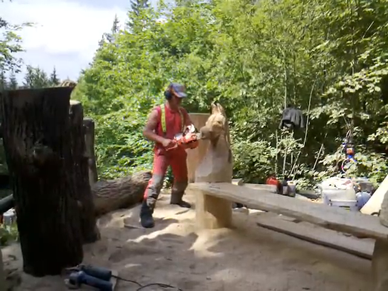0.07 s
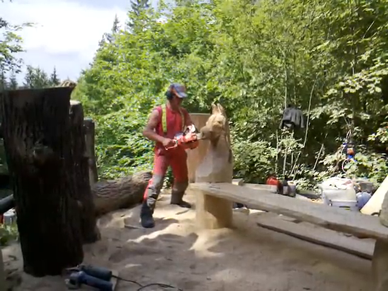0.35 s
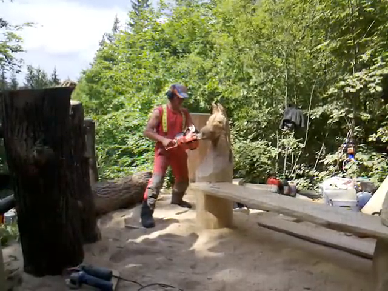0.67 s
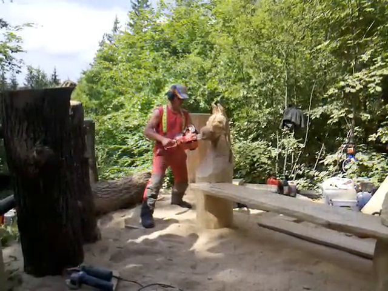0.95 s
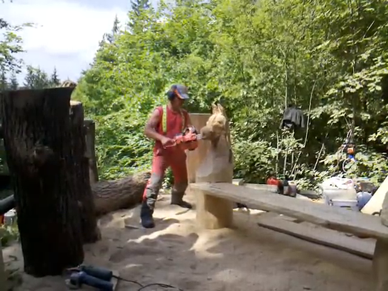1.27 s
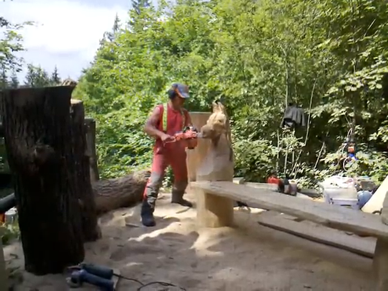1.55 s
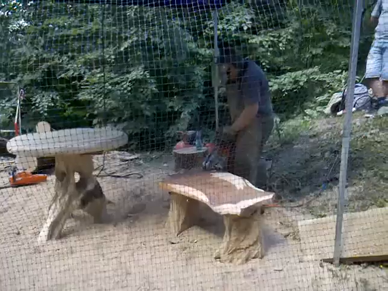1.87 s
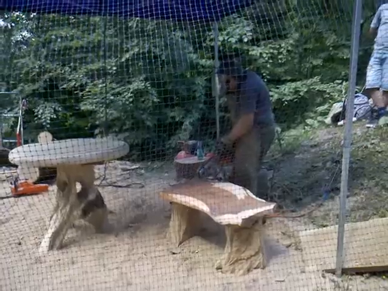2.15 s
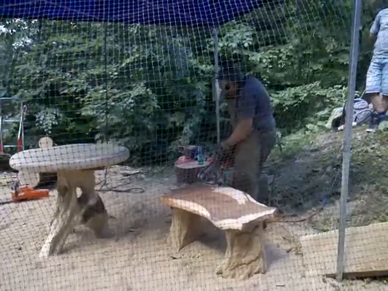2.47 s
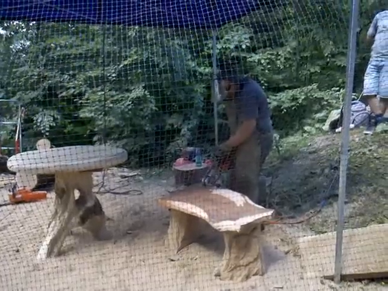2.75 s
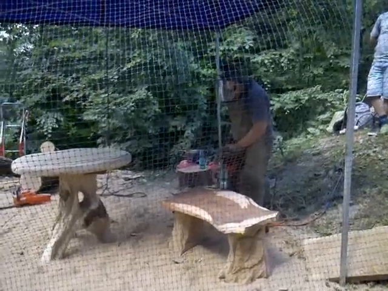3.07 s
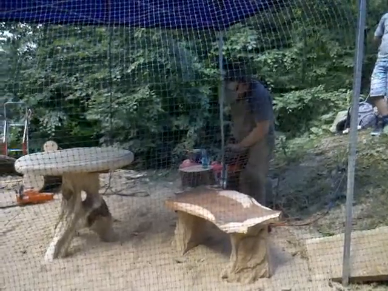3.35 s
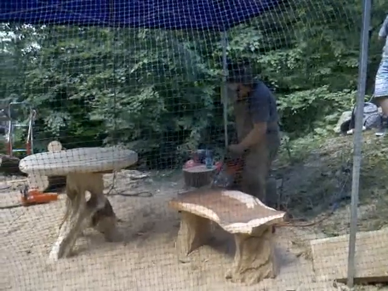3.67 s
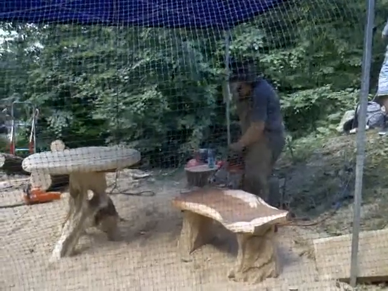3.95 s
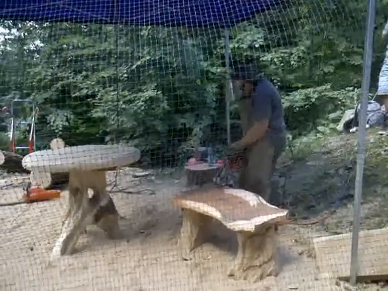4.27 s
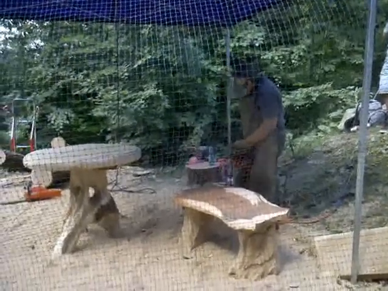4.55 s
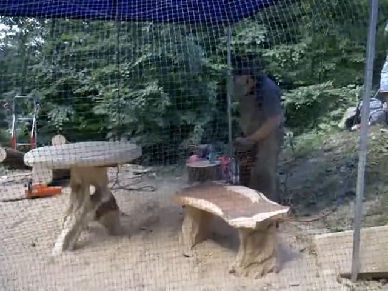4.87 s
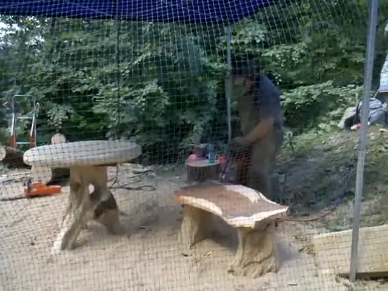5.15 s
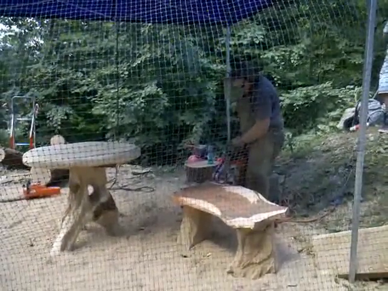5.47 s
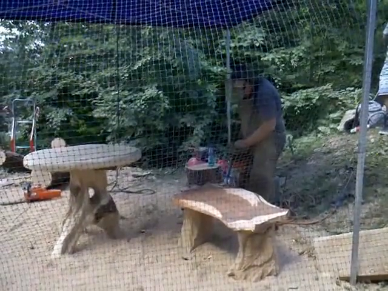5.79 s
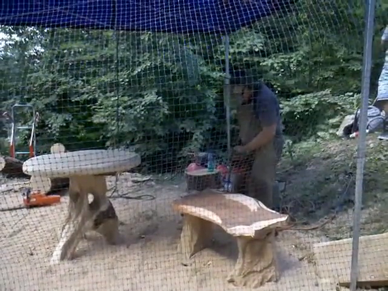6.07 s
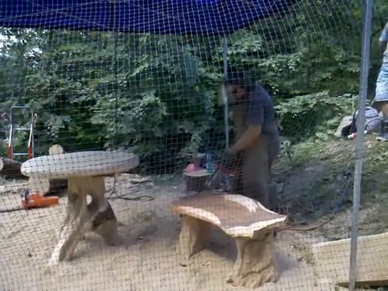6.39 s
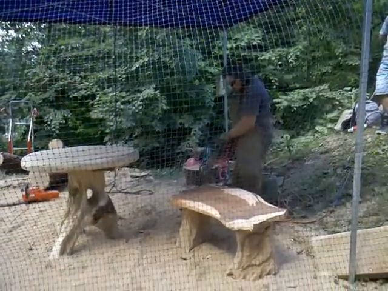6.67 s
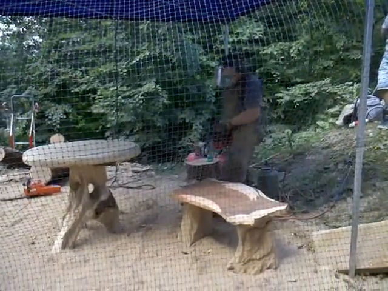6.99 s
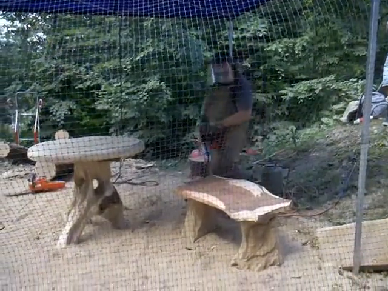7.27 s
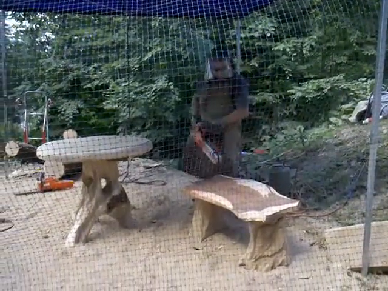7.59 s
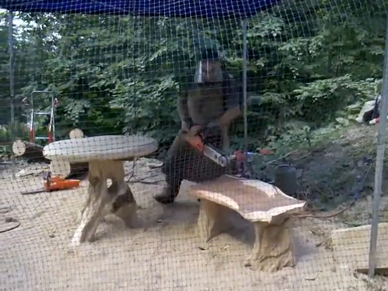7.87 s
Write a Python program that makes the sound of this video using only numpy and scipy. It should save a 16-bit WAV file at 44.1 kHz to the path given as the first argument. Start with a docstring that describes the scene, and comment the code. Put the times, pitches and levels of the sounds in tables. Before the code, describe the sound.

A two-stroke chainsaw is already running outdoors, revving in five short, light strokes on wood, with chain rattle and a high cutter hiss. A neighbouring saw revs faintly at the start, and a thin distant tool whine sounds then and again around 1.3 seconds. At about 1.75 seconds everything cuts to silence.

At 2.4 seconds a second chainsaw fades in at full throttle, chattering briefly as it bites into a stump. It holds one long, rasping, hissing cut, its pitch sagging and recovering under load. Shrill little chain squeaks come and go between 2.9 and 5.4 seconds, and faint dull thuds fall near 3.3, 4.7 and 6.2. At 6.7 the throttle lets go and the chain rattles freely. A quick blip follows at 7 seconds, then a louder rising rev from 7.6 to the end near 8. The sound is stereo with very short, light echoes.

```python
"""A two-stroke chainsaw revs in short strokes outdoors, other tools faint behind it; then silence.
A second wood carver's saw holds a long cut, lets go, blips the throttle and revs up again.
Engine speed drives both saws: firings ring the muffler, chain links rattle on the bar,
and the cutters hiss, chatter and squeak in the wood."""
import sys
import numpy as np
from scipy import signal
from scipy.fft import rfft, irfft, next_fast_len
from scipy.io import wavfile
from scipy.ndimage import uniform_filter1d

SR = 44100
rng = np.random.default_rng(int(sys.argv[2]) if len(sys.argv) > 2 else 0)


def persist_wave(psi):
    """Save psi, clipped to +-1, as 16-bit WAV."""
    counts = np.round(np.clip(psi, -1, 1) * 32767).astype(np.int16)
    wavfile.write(sys.argv[1], SR, np.atleast_2d(counts).T)


N = 349713
T = np.arange(N) / SR
STOP_S = 1.755  # first saw
START_S, FULL_S, RELEASE_S, LIFT_S, TURN_S = 2.4285, 2.73, 6.71, 7.28, 7.55  # second saw
WORKING_HZ, LINKS_PER_TURN, LINKS_IN_LOOP = 165, 7, 56
# muffler response, second and far saw: freq_hz, gain_db
MUFFLER = [(100, -61.5), (250, -57), (340, -16), (420, -28), (500, -7.5), (570, -2), (640, 8), (710, -1),
           (800, -20.5), (1000, -31), (1350, -20.5), (2000, -32), (3500, -50), (7000, -52)]


def undb(db):
    """Decibels to gain."""
    return 10 ** (np.asarray(db) / 20)


def curve(points):
    """Control signal through (time_s, value) points."""
    return np.interp(T, *np.transpose(points))


def over_hz(points):
    """Each table column interpolated over log frequency at every FFT bin."""
    hz, *columns = np.transpose(points)
    bins = np.fft.rfftfreq(next_fast_len(N + SR // 4, True) // 2 * 2, 1 / SR)
    return [np.interp(np.log(bins + 1), np.log(hz), c) for c in columns]


def colour(x, response):
    """Minimum-phase filter: clicks ring after they strike."""
    cepstrum = irfft(np.log(undb(over_hz(response)[0])))
    size = len(cepstrum)
    spectrum = np.exp(rfft(2 * cepstrum[:size // 2], size) - cepstrum[0])
    return irfft(rfft(x, size) * spectrum)[:N]


def level(x, db):
    """Set short-term rms to a level or level curve."""
    power = uniform_filter1d(uniform_filter1d(x * x, size=3000), size=3000)
    return x * undb(db) / np.sqrt(np.abs(power) + 1e-18)


def walk(rate_hz):
    """Smooth random wander, spread near 1."""
    step = max(int(SR / rate_hz), 2)
    return 1.27 * uniform_filter1d(rng.standard_normal(N)[np.arange(N) // step], step)


def ramp(start_s, length_s):
    """Linear rise from 0 to 1."""
    return np.clip((T - start_s) / length_s, 0, 1)


def held(events, attack_s, release_s):
    """Attack-hold-release gain of rows (start_s, end_s, ..., level_db)."""
    return sum(undb(db) * ramp(start, attack_s) * (1 - ramp(end, release_s))
               for start, end, *_, db in events)


def glides(strokes, ease):
    """Points (time_s, hz) through each stroke: lag > 1 delays the start, ease > 1 flattens the end."""
    progress = np.linspace(0, 1, 20)
    return [(start + (end - start) * u, first + (last - first) * (1 - (1 - u ** lag) ** ease))
            for start, end, first, last, lag, _ in strokes for u in progress]


def by_speed(speed_hz, db, db_per_octave):
    """Level rising with engine speed; db at WORKING_HZ."""
    return db + db_per_octave * np.log2(speed_hz / WORKING_HZ)


def crank(speed_hz, wobble):
    """Running count of turns of a slightly uneven shaft."""
    return np.cumsum(speed_hz * (1 + wobble * walk(60))) / SR


def pulses(cycles, scatter_db, jitter, pattern=(1,)):
    """One click a cycle, uneven in timing and size."""
    count = np.arange(1, int(cycles[-1]))
    timing, strength = rng.standard_normal((N // 30, 2))[count].T
    at = np.interp(count + jitter * timing, cycles, np.arange(N))
    size = undb(scatter_db * strength) * np.resize(pattern, len(count))
    i, fraction = at.astype(int), at % 1
    return (np.bincount(i, size * (1 - fraction), N + 1) + np.bincount(i + 1, size * fraction, N + 1))[:N]


def firing(turns, scatter_db, jitter, gas):
    """A pressure pulse and a puff of gas every turn."""
    puff = np.exp(-(turns % 1) / .29) * rng.standard_normal(N)
    return pulses(turns, scatter_db, jitter) + gas * puff


def rattle(turns, scatter_db, jitter, clatter_db, rush_db):
    """Unequal links knock loop after loop; the crank gear clatters alike each turn; air rushes."""
    links = pulses(LINKS_PER_TURN * turns, scatter_db, jitter, rng.standard_normal(LINKS_IN_LOOP))
    one_turn = rng.standard_normal(256)
    clatter = np.interp(turns, np.arange(256) / 256, one_turn, period=1) * undb(2 * walk(200))
    return level(links, 0) + level(clatter, clatter_db) + undb(rush_db) * rng.standard_normal(N)


def cutting(turns, throb, flicker_db):
    """Cutters tear fibres: noise that throbs with the engine and flickers with the bite."""
    bite = (1 + throb * np.cos(2 * np.pi * turns)) * undb(flicker_db * (walk(45) + walk(500)))
    return bite * rng.standard_normal(N)


def tones(turns, orders, waver_db):
    """Intake hum or fan whine: steeply louder with speed, wavering as the saw moves."""
    push = (np.gradient(turns) * SR / WORKING_HZ) ** 3
    return push * sum(2 ** .5 * undb(db + waver_db * walk(14)) * np.sin(2 * np.pi * round(order) * turns)
                      for order, db in orders)


def first_saw():
    """Short light strokes with the tip of the bar."""
    # throttle squeezes: open_s, close_s, open_hz, close_hz, lag, exhaust_db
    strokes = [(0, .43, 186.1, 161.7, 1.78, -28), (.52, .73, 161.9, 183, 1.28, -24.5),
               (.93, 1.13, 140.5, 160, 1.15, -24.5), (1.16, 1.47, 160.6, 179.9, 1.3, -24),
               (1.56, 1.9, 156.9, 179.5, 1.1, -24)]
    # muffler, bar and cutter responses: freq_hz, gain_db
    muffler = [(170, -36), (340, -18.5), (480, 1), (700, 0.5), (850, -10.5), (1050, -0.5), (1350, -13),
               (1550, -1), (1950, -16.5), (6000, -55.5)]
    bar = [(60, -25), (250, -8.5), (500, 3), (1000, 2), (2200, -3), (3400, -7.5), (4300, 0), (5400, -6.5),
           (11000, -12.5)]
    cutters = [(4000, -34), (8000, -20.5), (9500, -7), (10900, -6.5), (11900, 0.5), (12600, 0.5),
               (13700, -5)]
    # intake hum at WORKING_HZ: crank_order, level_db
    intake = [(1, -43.5), (2, -45)]
    speed_hz = curve(glides(strokes, ease=1.6))
    turns = crank(speed_hz, wobble=.002)
    firings = firing(turns, scatter_db=.8, jitter=.003, gas=.007)
    throttle = np.maximum(held(strokes, attack_s=.025, release_s=.047), undb(-30.5))  # floor: coasting
    exhaust = level(colour(firings, muffler), 0) * throttle
    knocks = rattle(turns, scatter_db=-4.5, jitter=.018, clatter_db=-2, rush_db=6.5)
    chain = level(colour(knocks, bar), by_speed(speed_hz, db=-27, db_per_octave=4.5))
    tearing = cutting(turns, throb=.11, flicker_db=1.16)
    hiss = level(colour(tearing, cutters), by_speed(speed_hz, db=-24.5, db_per_octave=3))
    return exhaust + chain + hiss + tones(turns, intake, waver_db=3)


def far_saw():
    """A neighbour's saw revs once; only its exhaust is heard."""
    # throttle squeeze: open_s, close_s, open_hz, close_hz, lag, exhaust_db
    strokes = [(0.0028, .35, 153, 178, 3.4, -31.5)]
    turns = crank(curve(glides(strokes, ease=1.8)), wobble=.0026)
    firings = firing(turns, scatter_db=3.5, jitter=.004, gas=.012)
    return level(colour(firings, MUFFLER), 0) * held(strokes, attack_s=.045, release_s=.06)


def far_whine():
    """Another distant tool: a thin, sagging tone, twice."""
    # whines: start_s, end_s, first_hz, last_hz, lag, peak_db
    whines = [(0, .38, 2613, 2514, 1, -37), (1.32, 1.75, 2443, 2397, 1.3, -40)]
    cycles = crank(curve(glides(whines, ease=.91)), wobble=.002)
    return held(whines, attack_s=.04, release_s=.05) * np.sin(2 * np.pi * cycles)


def second_exhaust(turns, speed_hz, strokes, facing):
    """Firings ring the muffler, in the cut loudest at its tuned speed."""
    # muffler response, outlet head-on: freq_hz, gain_db
    outlet = [(200, -53.5), (320, -9), (650, 10), (820, -11), (1450, -18), (1900, -31), (5000, -47.5)]
    tuned_hz, width_hz = 159.6, 12
    off_tune_db = -1.5 * ((speed_hz - tuned_hz) / width_hz) ** 2
    in_cut = held([(START_S, RELEASE_S, -22.5)], attack_s=.02, release_s=.035) * undb(off_tune_db)
    revs = held(strokes, attack_s=.045, release_s=.032)
    throttle = np.maximum(in_cut + revs, undb(-39))  # floor: coasting
    firings = firing(turns, scatter_db=.7, jitter=.003, gas=.009)
    exhaust = (1 - facing) * colour(firings, MUFFLER) + facing * colour(firings, outlet)
    return level(exhaust, 0) * throttle


def second_chain(knocks, speed_hz, free):
    """Knocks ring the bar, first in the wood, then in free air."""
    # bar responses: freq_hz, gain_db
    bar_in_wood = [(900, -31.5), (2000, 0.5), (2700, -5.5), (3200, -0.5), (3600, 3.5), (4000, -3),
                   (4300, 3.5), (4600, 6), (5000, -3), (6000, -6.5), (6700, -4), (7450, 1), (8100, -15),
                   (11000, -40)]
    bar_in_air = [(1000, -23), (2000, -0.5), (3500, -3.5), (4250, 3.5), (4750, 4), (5800, -9), (11000, -12)]
    lifted = ramp(LIFT_S, .42)  # bar rises from behind the stump
    ringing = (1 - free) * colour(knocks, bar_in_wood) + free * colour(knocks, bar_in_air)
    return level(ringing, by_speed(speed_hz, db=-25.5, db_per_octave=9) + .7 * free + 2.5 * lifted)


def second_hiss(turns, speed_hz, strokes, free):
    """Cutter hiss: fades as the bar sinks in, weakest when the chain coasts."""
    # cutter response: freq_hz, gain_db
    cutters = [(4000, -32.5), (8200, -6), (9700, 2), (10900, -1.5), (11500, 1.5), (12200, 4.5), (12700, -7),
               (13700, -5)]
    depth = ramp(START_S, RELEASE_S - START_S)
    driven = held([(start, end, 0) for start, end, *_ in strokes], attack_s=.08, release_s=.12)
    hiss_db = by_speed(speed_hz, db=-23.3, db_per_octave=6) - 1.6 * depth - free * (8 - 6 * driven)
    tearing = cutting(turns, throb=.034, flicker_db=1.4)
    return level(colour(tearing, cutters), hiss_db + 1.1 * walk(12))


def rasp(turns, knocks, speed_hz, free, facing):
    """Midrange rasp of cutters and knocks in wood; knocks alone once the bar is free."""
    # wood response: freq_hz, gain_db
    wood = [(40, -40.5), (140, -12.5), (330, -4.5), (440, -7), (600, 9), (850, -2.5), (1200, 3), (1600, 0),
            (1850, 1.5), (2700, -25.5), (6000, -45)]
    rubbing = (1 - free) * cutting(turns, throb=.32, flicker_db=.56) + level(knocks, -4.5)
    rasp_db = by_speed(speed_hz, db=-27, db_per_octave=2.5) - 1.2 * free + 1.5 * facing
    return level(colour(rubbing, wood), rasp_db)


def sprocket(turns, db, waver_db):
    """Drive links meet the sprocket with an unsteady whine."""
    return undb(db + waver_db * walk(40)) * np.sin(2 * np.pi * LINKS_PER_TURN * turns + 1.1 * walk(50))


def second_saw():
    """A long cut into a stump, then two bursts of throttle in free air."""
    # full throttle, slowed as the carver leans on the wood: time_s, speed_hz
    cut_speed = [(2.45, 174.2), (2.59, 175.6), (2.93, 155.4), (3.1, 158.8), (3.4, 174.8), (3.53, 173.1),
                 (3.88, 154.8), (4.01, 155.8), (4.2, 164.8), (4.31, 161.5), (4.56, 147.4), (4.98, 160.9),
                 (5.69, 176.3), (6.06, 165.9), (6.3, 168.6), (6.5, 162.3), (6.73, 176.2)]
    # squeezes in free air: open_s, close_s, open_hz, close_hz, lag, exhaust_db
    strokes = [(6.945, 7.115, 155, 163.6, 2.2, -20.5), (7.565, 7.929, 128.3, 181.5, 1.75, -18)]
    # cutters bite deeper: start_s, end_s, boost_db
    bites = [(2.65, 2.8, 2), (3.1, 3.55, 0.9), (4.08, 4.28, 1.15), (5.55, 5.92, 2), (6.1, 6.5, .8)]
    # intake hum at WORKING_HZ: crank_order, level_db
    intake = [(1, -47.5), (2, -44), (3, -40.5), (8, -46)]
    speed_hz = curve(list(cut_speed) + glides(strokes, ease=1.8))
    turns = crank(speed_hz, wobble=.001966)
    free = ramp(RELEASE_S, .068)  # bar leaves the wood
    facing = ramp(TURN_S, .16)  # muffler outlet swings to the listener
    bite = np.maximum(held(bites, attack_s=.041, release_s=.12), 1)
    exhaust = second_exhaust(turns, speed_hz, strokes, facing)
    knocks = rattle(turns, scatter_db=1, jitter=.011, clatter_db=-3 + 6.6 * free, rush_db=8.5)
    chain = bite * second_chain(knocks, speed_hz, free)
    hiss = second_hiss(turns, speed_hz, strokes, free)
    wood = bite * rasp(turns, knocks, speed_hz, free, facing)
    fan = tones(turns, [(18, -51 + 14 * free * (T < TURN_S))], waver_db=6.5)  # 18 flywheel fins
    whine = tones(turns, intake, waver_db=2.5) + fan + sprocket(turns, db=-35 - 10 * free, waver_db=4)
    cut_noises = chatter(turns) + thuds() + squeak(turns, pitch_hz=9550, width_hz=150)
    return exhaust + chain + hiss + wood + whine + cut_noises


def chatter(turns):
    """The bar bounces on every fourth link until the cut has formed."""
    # bouts: centre_s, half_width_s, level_db
    bouts = [(2.637, 0.023, -14), (2.761, .025, -24.5)]
    # kerf response: freq_hz, gain_db
    kerf = [(250, -39.5), (620, 8.5), (1230, 3.5), (1850, -2), (2300, -26), (5000, -45.5)]
    knocks = pulses(turns * LINKS_PER_TURN / 4, scatter_db=1.5, jitter=.012)
    swell = sum(undb(db) * np.exp(-((T - centre) / half) ** 2) for centre, half, db in bouts)
    return level(colour(knocks, kerf), 0) * swell


def squeak(turns, pitch_hz, width_hz):
    """The chain rubs in the cut every third turn: short shrill chirps."""
    # squeaky spells: start_s, end_s, level_db
    spells = [(2.92, 3.4, -28), (3.5, 4.2, -31.5), (4.56, 4.9, -24), (4.97, 5.38, -28)]
    clicks = pulses(turns / 3, scatter_db=5.5, jitter=.03)
    rubs = signal.fftconvolve(clicks, np.hanning(int(.006 * SR)), "same")
    ring = np.sin(2 * np.pi * np.cumsum(pitch_hz + width_hz * walk(2500)) / SR)
    return level(rubs * ring, 0) * held(spells, attack_s=.03, release_s=.08)


def thuds():
    """Dull thuds, likely the saw bumping the stump."""
    # bumps: start_s, end_s, level_db
    bumps = [(3.28, 3.32, -35.5), (4.72, 4.77, -36.5), (6.23, 6.26, -41)]
    # stump response: freq_hz, gain_db
    stump = [(50, -28.5), (130, -6.5), (200, -1.5), (320, 3.5), (700, -29)]
    return level(colour(rng.standard_normal(N), stump), 0) * held(bumps, attack_s=.015, release_s=.04)


def echoes(x, t60_s):
    """Diffuse echoes from ground, timber and trees."""
    t = T[:SR // 3]
    tail = rng.standard_normal(len(t)) * undb(-60 * t / t60_s) * (t > .004)
    return signal.fftconvolve(x, tail / np.linalg.norm(tail))[:N]


def stereo(mid):
    """Two close microphone ports: side mostly a quarter cycle off mid, diffuse in the treble."""
    # side relative to mid: freq_hz, width_db, in_phase_share, quadrature_share
    ports = [(60, 12.5, 0, .9), (170, 6, 0.021, 0.67), (330, 2, 0.34, 0.9), (650, -13.5, 0.36, .8),
             (950, -6, .4, -0.079), (1350, -19.5, .1, -.5), (2113, -2, -.3, -.6), (2800, 6, -0.26, .6),
             (3900, 8.5, -.2, .6), (4585, -0.5, -.1, -0.71), (7500, 1, 0.22, 0), (9600, -1.5, 0, 0),
             (11500, 1, -0.058, 0)]
    width_db, in_phase, quadrature = over_hz(ports)
    direct = in_phase + 1j * quadrature
    size = 2 * (len(direct) - 1)
    diffuse = np.sqrt(np.clip(1 - np.abs(direct) ** 2, 0, 1)) * rfft(echoes(mid, t60_s=.19), size)
    side = irfft(undb(width_db) * (direct * rfft(mid, size) + diffuse))[:N]
    return np.array([mid + side, mid - side])


def scene():
    """The first saw and far tools break off; after a pause the second saw fades in."""
    fade_out = np.clip((STOP_S - T) / .015, 0, 1)
    fade_in = ramp(START_S, FULL_S - START_S)
    opening = first_saw() + far_saw() + far_whine()
    saws = np.where(T < (STOP_S + START_S) / 2, opening, second_saw())
    return stereo(saws + undb(-12) * echoes(saws, t60_s=.15)) * (fade_out + fade_in)


def record(dry):
    """Steep low-pass on the top treble."""
    cutoff_hz = 13900
    return signal.sosfilt(signal.ellip(12, .2, 80, cutoff_hz, fs=SR, output="sos"), dry)


dry = scene()
out = record(dry)
persist_wave(out)
```